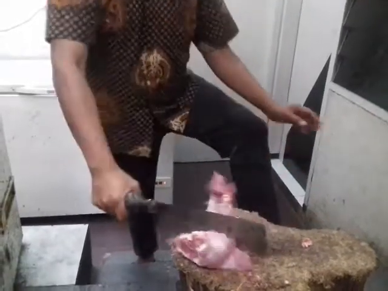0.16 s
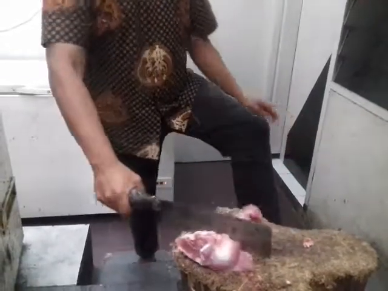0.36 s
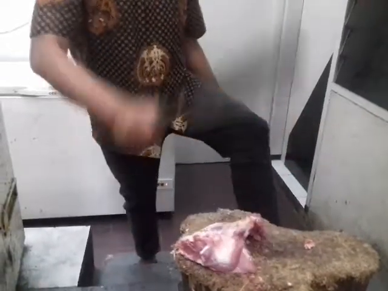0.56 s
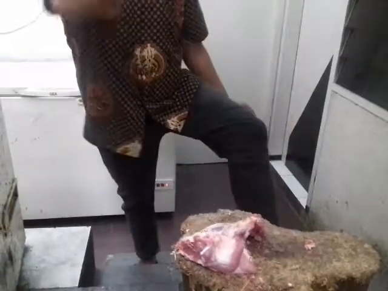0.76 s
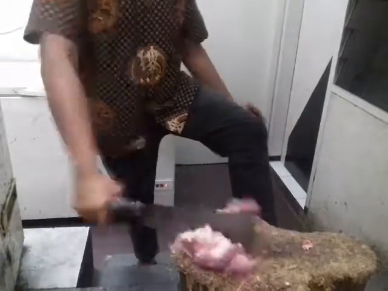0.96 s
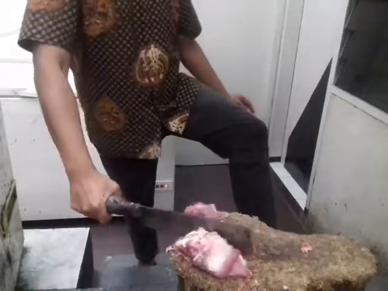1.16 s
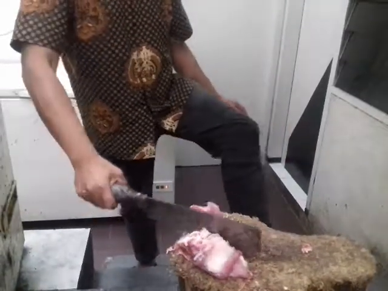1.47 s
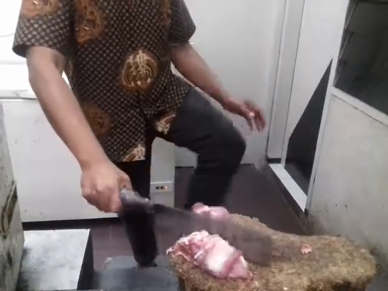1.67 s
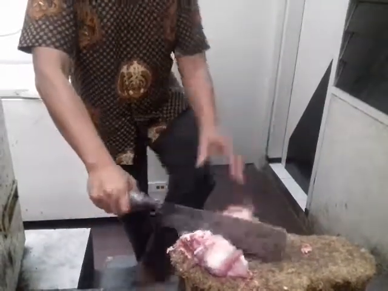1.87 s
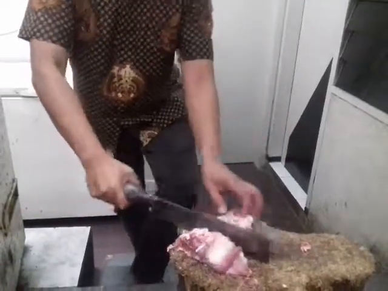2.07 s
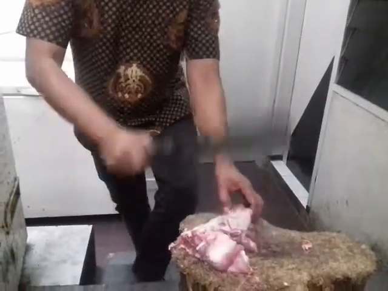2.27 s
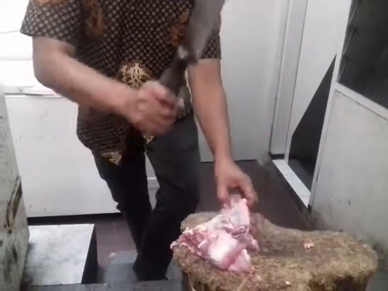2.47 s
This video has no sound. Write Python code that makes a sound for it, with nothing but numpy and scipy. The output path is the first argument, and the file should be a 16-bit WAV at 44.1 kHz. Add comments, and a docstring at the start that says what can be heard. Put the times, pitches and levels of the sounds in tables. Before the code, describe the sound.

Two loud cleaver chops crack through bone into a chopping block, the second clankier and less crunchy, bright echoes fading off hard walls over steady hiss and faint low drone, with a soft hum rising last.

```python
"""In a hard-walled passage, a heavy cleaver chops twice through meat and bone on a wooden block.
Each chop layers a noise-burst crack with dying sines for the damped clank, block thud and blade ring.
The walls answer with single reflections, standing waves and a dense, levelled echo of filtered noise.
Behind it a noise hiss dips at the second chop and turns duller, above a narrow low drone.
A sleeve brushes faintly before the second chop, and a low wavering hum swells towards the end."""
import sys
import numpy as np
from scipy import signal
from scipy.fft import rfft, irfft
from scipy.io import wavfile
from scipy.ndimage import uniform_filter1d

SR = 44100
rng = np.random.default_rng(int(sys.argv[2]) if len(sys.argv) > 2 else 0)


def dump_mix(stems):
    """Bounce the given channels to the path in sys.argv[1] as a 16-bit WAV at rate SR."""
    frames = np.atleast_2d(stems).T  # one column per channel
    limited = np.clip(frames, -1, 1)  # hard clip at full scale
    pcm = np.round(limited * 32767).astype(np.int16)
    wavfile.write(sys.argv[1], SR, pcm)


N = 114660  # length in samples

# Tilt of splintering bone: pitch_hz, gain_per_bone (dB gained per dB of bone)
BONE_TILT = [(200, .3), (800, -0.11), (1500, 0.86), (2500, 0.24), (4000, 0.19), (6500, 0.4), (9000, 1.5),
             (15000, 1.3)]
# Background over time: time_s, level_db (hiss and drone), treble_db (extra, hiss only)
BACKGROUND_LEVEL = [(0, -1, 2.5), (0.6, 2, 2), (1.02, 0.5, 2), (1.075, -7.5, 2), (1.4, -1.5, -9),
                    (1.8, -8.5, -4), (2.2, -8.5, -9), (2.4, -3.5, -6), (2.6, -1, -3.5)]
CONTACT_RISE_S = 0.00046  # onset of both crack and clank


def amp(db):
    """Decibels to gain."""
    return 10 ** (np.asarray(db) / 20)


def unit(x):
    """Scales to rms 1."""
    return x / np.sqrt(np.mean(x ** 2) + 1e-20)


def read(points, hz):
    """Reads a table on a log-frequency axis."""
    f, value = np.transpose(points)
    return np.interp(np.log(hz + 1), np.log(f + 1), value)


def add(mix, s, sound):
    """Mixes a sound in at time s."""
    part = mix[max(round(s * SR), 0):][:len(sound)]
    part += sound[:len(part)]


def decay(t, t60):
    """Exponential fall by 60 dB in t60 seconds."""
    return np.exp(-np.log(1000) * t / t60)


def low_cut(x, hz):
    """Second-order high-pass."""
    return signal.sosfilt(signal.butter(2, hz, "high", fs=SR, output="sos"), x)


def band(centre_hz, width_hz):
    """Noise in one bell-shaped band, rms 1."""
    hz = np.fft.rfftfreq(N, 1 / SR)
    bell = np.exp(-2 * ((hz - centre_hz) / width_hz) ** 2)
    return unit(irfft(rfft(rng.standard_normal(N)) * bell, N))


def colour(x, spectrum, bone_db, size=4096):
    """Causal filter: a spectrum of unit power, tilted by more or less splintering bone."""
    hz = abs(np.fft.fftfreq(size, 1 / SR))
    gain = unit(amp(read(spectrum, hz))) * amp(bone_db * read(BONE_TILT, hz))
    # minimum phase: the phase follows from the log gain, so nothing sounds before the hit
    taps = np.fft.ifft(np.exp(np.conj(signal.hilbert(np.log(gain))))).real
    return signal.fftconvolve(x, taps[:size // 2])[:len(x)]


def ring(modes, t, rise_s):
    """Dying sines of random phase that swell in together."""
    phases = rng.random(len(modes))
    lines = sum(amp(db) * decay(t, t60) * np.sin(2 * np.pi * (hz * t + phase))
                for (hz, db, t60), phase in zip(modes, phases))
    return lines * (1 - np.exp(-t / rise_s))


def drone():
    """A narrow low band of noise that sinks and rises with the hiss."""
    centre_hz, width_hz, base_db = 74, 22, -64
    s, level_db, _ = np.transpose(BACKGROUND_LEVEL)
    return band(centre_hz, width_hz) * amp(base_db + np.interp(np.arange(N) / SR, s, level_db))


def hum():
    """A low sine whose pitch wavers at random, perhaps a distant motor."""
    # time_s, level_db (rms)
    hum_level = [(0, -89), (1.201, -77.5), (1.9, -75), (2.28, -66), (2.37, -70), (2.46, -60.5), (2.6, -52)]
    pitch_hz, waver_depth = 171.3, 0.006  # depth: rms fraction of the pitch
    waver = unit(uniform_filter1d(rng.standard_normal(N), size=4000))
    tone = np.sin(2 * np.pi * np.cumsum(pitch_hz * (1 + waver_depth * waver)) / SR)
    return unit(tone) * amp(np.interp(np.arange(N) / SR, *np.transpose(hum_level)))


def background(size=2048):
    """A faintly patchy noise hiss whose level and treble move separately over time."""
    # pitch_hz, level_db (relative, per Hz)
    hiss_spectrum = [(20, -27), (45, -18), (72, 4), (100, -2.5), (200, 0), (500, -3), (1000, -3),
                     (2000, -1), (4000, -2.5), (5000, -13.5), (6500, -27.5), (10000, -33), (15000, -37.5)]
    base_db, patch_db = -53, 0.38
    treble_from_hz, treble_full_hz = 5600, 7000
    overlap = size - size // 4
    hz, at, z = signal.stft(rng.standard_normal(N), SR, nperseg=size, noverlap=overlap)

    # noise smoothed across pitch, then time
    patches = uniform_filter1d(rng.standard_normal(z.shape), size=16, axis=0)
    patches = unit(uniform_filter1d(patches, size=6, axis=1))
    s, level_db, treble_db = np.transpose(BACKGROUND_LEVEL)
    treble_share = read([(treble_from_hz, 0), (treble_full_hz, 1)], hz)[:, None]
    treble = treble_share * np.interp(at, s, treble_db)

    z = z * unit(amp(read(hiss_spectrum, hz)))[:, None] * amp(treble + patch_db * patches)
    hiss = signal.istft(z, SR, nperseg=size, noverlap=overlap)[1][:N]
    return hiss * amp(base_db + np.interp(np.arange(N) / SR, s, level_db))


def swing():
    """A sleeve brushes as the arm swings down: a treble band of noise swells and fades."""
    # start_s, length_s, level_db (at the top of the swell)
    sleeve_brushes = [(0.918, 0.11, -71)]
    t = np.arange(N) / SR
    swell = sum(amp(db) * np.sin(np.pi * np.clip((t - s) / length, 0, 1))
                for s, length, db in sleeve_brushes)
    return swell * band(centre_hz=6000, width_hz=1200)


def ripple(x, size=30):
    """Parallel walls favour some pitches and swallow others at random."""
    depth_db = 2.0
    z = rfft(x)
    wander = unit(uniform_filter1d(rng.standard_normal(len(z)), size=size))
    return irfft(z * amp(depth_db * wander), len(x))


def walls(t, build_s, hold_s, bone_db, size=256):
    """Dense echo, levelled by the recorder's limiter: swells, stays level, then dies band by band."""
    # pitch_hz, level_db (relative, per Hz)
    wall_spectrum = [(40, -47), (100, -17.5), (160, -17), (210, -4.5), (560, -4), (700, -10), (1050, -10.5),
                     (1550, -1), (2500, 0), (3000, -3), (3750, 4.5), (4400, -6.5), (5400, -12),
                     (7000, -29.5), (10000, -36.5), (15000, -48)]
    # pitch_hz, t60_s
    wall_decay = [(100, 0.52), (300, 0.63), (1000, 0.61), (2500, 0.57), (4000, 0.6), (6500, 0.57),
                  (8000, 0.5), (14000, 0.58)]
    grain_db = 3.0  # random spread in strength from sample to sample
    grains = rng.choice([-1., 1.], len(t)) * amp(grain_db * rng.standard_normal(len(t)))
    hz, at, z = signal.stft(unit(ripple(grains)), SR, nperseg=size)
    # the limiter's levelling is drawn as a plateau: no decay until hold_s
    z = z * decay(np.maximum(at - hold_s, 0), read(wall_decay, hz)[:, None])
    tail = signal.istft(z, SR, nperseg=size)[1][:len(t)]
    return colour(tail * (1 - np.exp(-(t / build_s) ** 2)), wall_spectrum, bone_db)


def standing_waves(t):
    """Low resonances between the walls swell in and ring down."""
    # pitch_hz, level_db, t60_s
    room_modes = [(202, -36, .42), (254, -36, .52), (362, -36, .52), (571, -38, .55)]
    return ring(room_modes, t, rise_s=0.021)


def thud(t):
    """The blade lands and pushes all modes of the wooden block at once, in phase."""
    # pitch_hz, level_db (relative), t60_s
    block_modes = [(150, -11, 0.098), (261.7, -15, 0.23), (371, 7.5, 0.023), (479, -0.5, 0.048),
                   (557, -13.5, 0.13), (797, -8, 0.094)]
    rise_s, low_cut_hz = 0.00066, 134
    modes = sum(amp(db) * decay(t, t60) * np.cos(2 * np.pi * hz * t) for hz, db, t60 in block_modes)
    return low_cut(-modes * (1 - np.exp(-t / rise_s)), low_cut_hz)


def blade(t, bone_db):
    """The freed steel rings on; the less bone it meets, the stronger its main bending modes."""
    # pitch_hz, level_db (relative), t60_s
    blade_modes = [(1538, -10, .65), (2069, -10, .55), (2297, -6, .55), (2576, 0, .66), (2601, -7, .58),
                   (2712, -8, .52), (3037, -11, .5), (3415, -10, .5), (3528, -8, .62), (3607, -3, .55),
                   (3704, 2, .58), (3753, -5, .62), (3976, -9, .58), (4133, -10, .52)]
    blade_db, build_s = -29, 0.034
    bend_hz, bend_width_hz = 2590, 140
    bend_db = 2.0 - 0.75 * bone_db  # lift at the centre of the bending modes
    modes = [(hz, db + bend_db * np.exp(-((hz - bend_hz) / bend_width_hz) ** 2), t60)
             for hz, db, t60 in blade_modes]
    return amp(blade_db) * ring(modes, t, build_s)


def clank(t, bone_db):
    """A short knock of the blade, damped by meat; bone shifts the balance of its modes."""
    # pitch_hz, level_db (relative), t60_s
    damped_modes = [(1162, -4.5, 0.086), (2096, -2.5, 0.12), (2420, -4, 0.036), (2643, 3, 0.078),
                    (3170, -6, 0.019), (3720, 0.5, 0.056), (4100, 0.5, 0.058), (5160, -5.5, .05),
                    (9300, -29, .04)]
    modes = [(hz, db + bone_db * read(BONE_TILT, hz), t60) for hz, db, t60 in damped_modes]
    return ring(modes, t, CONTACT_RISE_S)


def crack(t, bone_db):
    """The edge crunches through bone: a burst of noise a few milliseconds long."""
    # pitch_hz, level_db (relative, per Hz)
    crack_spectrum = [(100, -26), (500, -16), (1100, -1), (2000, 0), (2700, 2.5), (4000, 1), (5200, -8.5),
                      (6200, -20.5), (8000, -34), (15000, -38)]
    hold_s, fall_s = 0.0057, 0.0041
    envelope = np.minimum(t / CONTACT_RISE_S, 1) * np.exp(-np.maximum(t - hold_s, 0) / fall_s)
    return colour(rng.choice([-1., 1.], len(t)) * envelope, crack_spectrum, bone_db)


def chops():
    """Each blow cracks, clanks, thuds and rings, and the walls throw it back."""
    # start_s, crack_db, clank_db, thud_db, walls_db, echo_build_s, echo_hold_s, bone_db
    blows = [(0.2185, -17.5, -25, -20, -19.5, 0.0029, 0.029, -1.5),
             (1.0788, -19.5, -18.5, -24.5, -19.5, 0.021, 0.036, -7.5)]
    # single reflections of crack and clank: delay_s, level_db (relative to the direct sound)
    wall_slaps = [(0.0108, -13.5), (0.0185, -20), (0.033, -15), (0.042, -7.5), (0.076, -8.5)]
    thud_delay_s = 0.003255
    out, t = np.zeros(N), np.arange(SR) / SR
    for s, crack_db, clank_db, thud_db, walls_db, build_s, hold_s, bone_db in blows:
        snap = amp(crack_db) * crack(t, bone_db) + amp(clank_db) * clank(t, bone_db)
        echo = amp(walls_db) * walls(t, build_s, hold_s, bone_db)
        add(out, s, snap + blade(t, bone_db) + echo)
        for delay_s, slap_db in wall_slaps:
            add(out, s + delay_s, amp(slap_db) * snap)
        add(out, s + thud_delay_s, amp(thud_db) * thud(t) + standing_waves(t))
    return out


def scene():
    """Chops over the background, in mono."""
    return (drone() + hum() + background() + swing() + chops())[None]


def record(dry):
    """The microphone's low cut and the band limit of the recorder."""
    low_cut_hz, top_hz = 66, 15600
    band_limit = signal.firwin(511, top_hz, window=("kaiser", 9), fs=SR)
    return signal.oaconvolve(low_cut(dry, low_cut_hz), band_limit[None], "same")


dry = scene()
out = record(dry)
dump_mix(out)
```